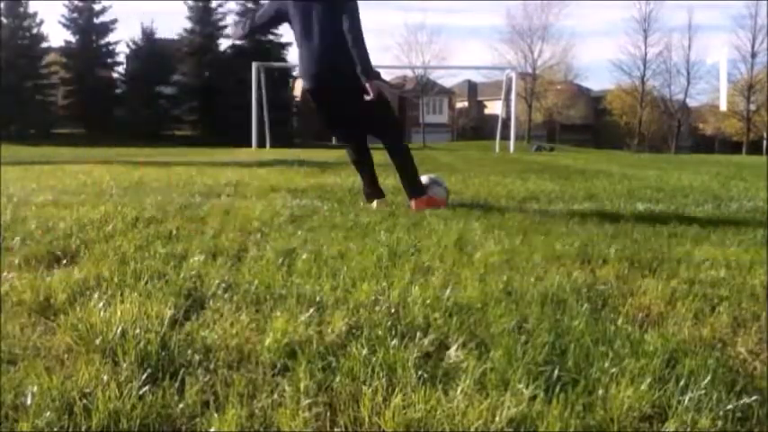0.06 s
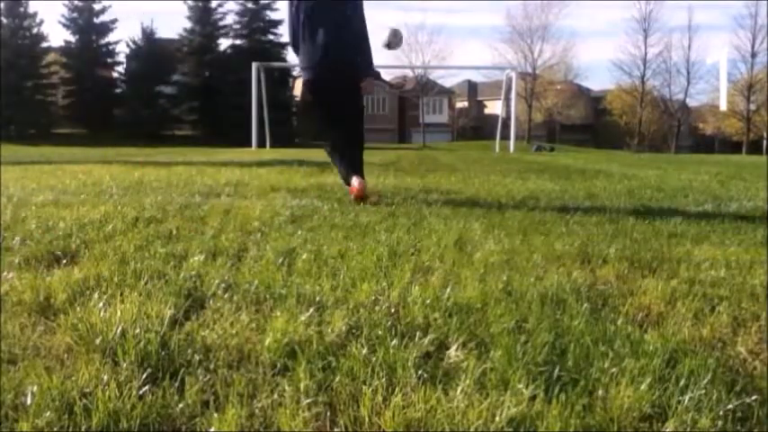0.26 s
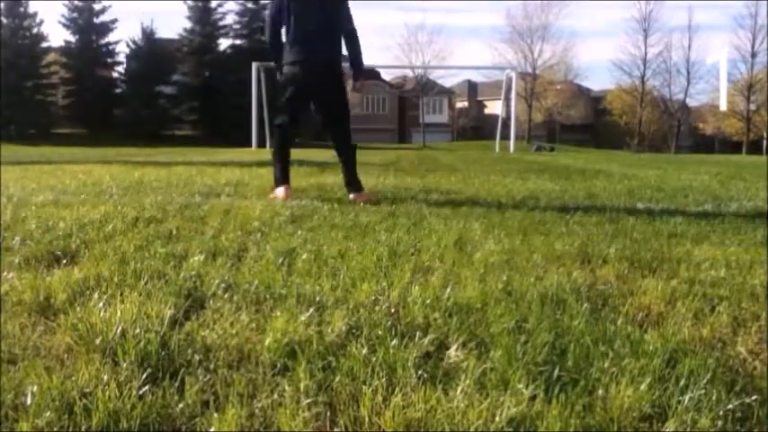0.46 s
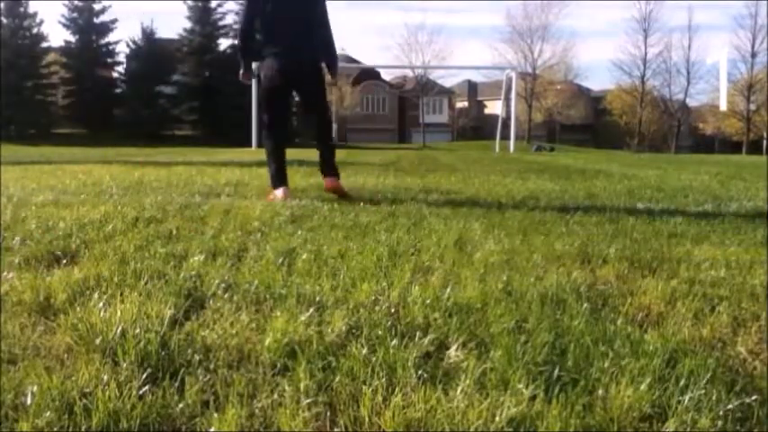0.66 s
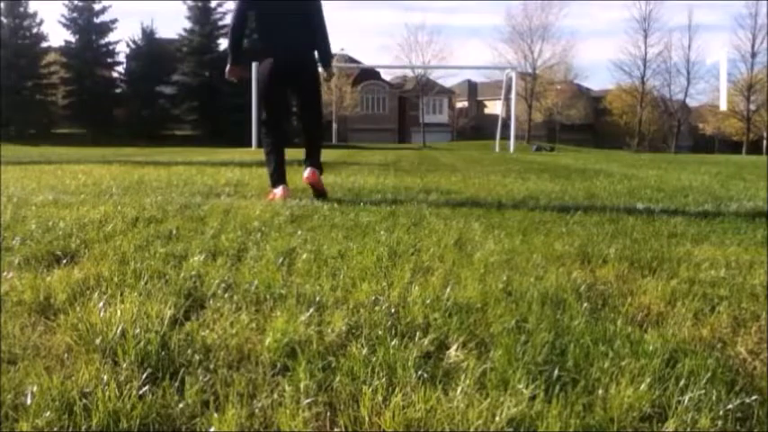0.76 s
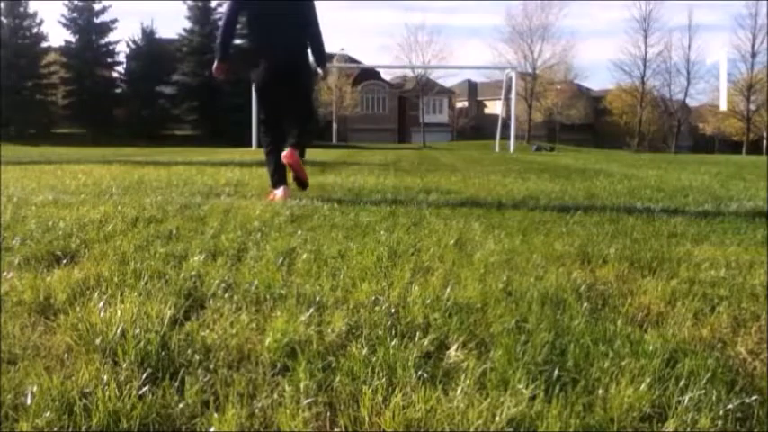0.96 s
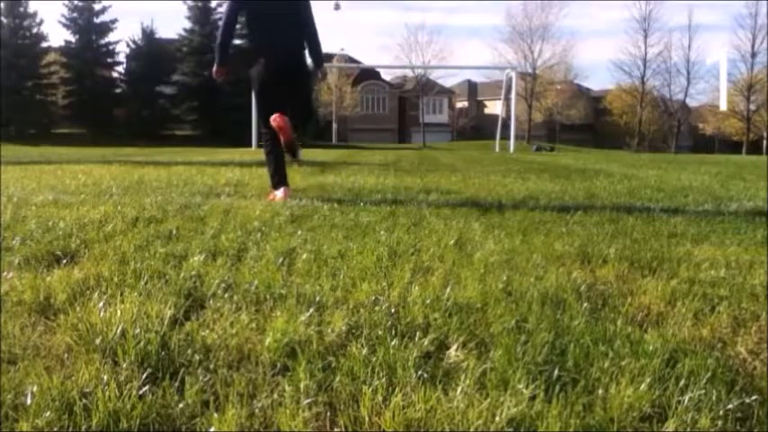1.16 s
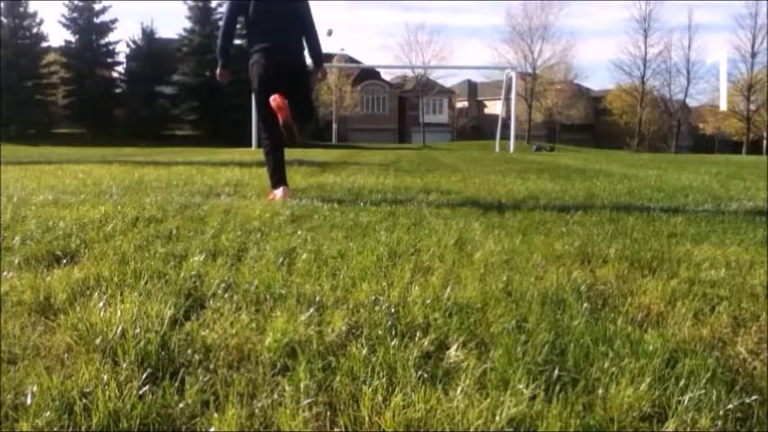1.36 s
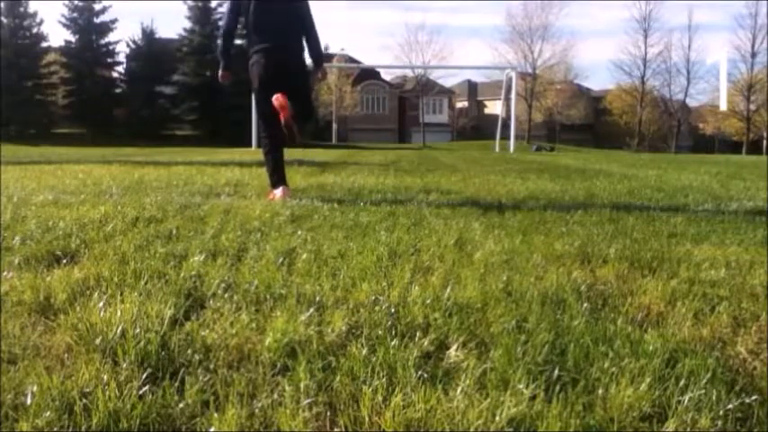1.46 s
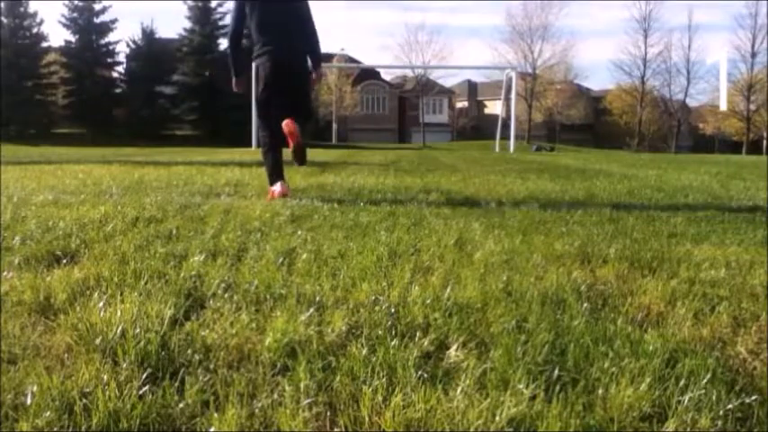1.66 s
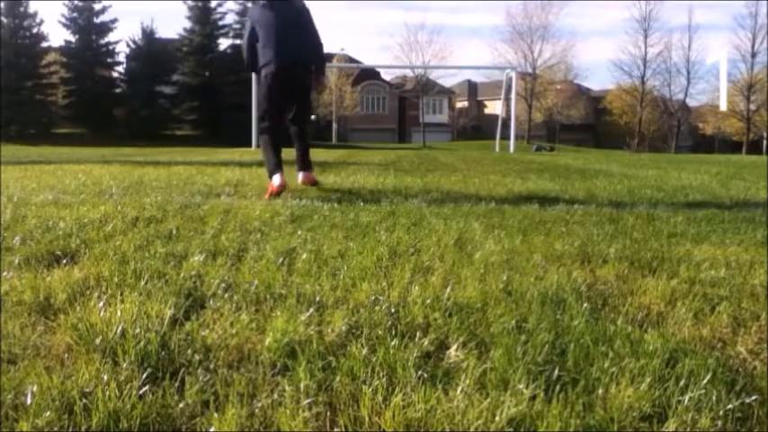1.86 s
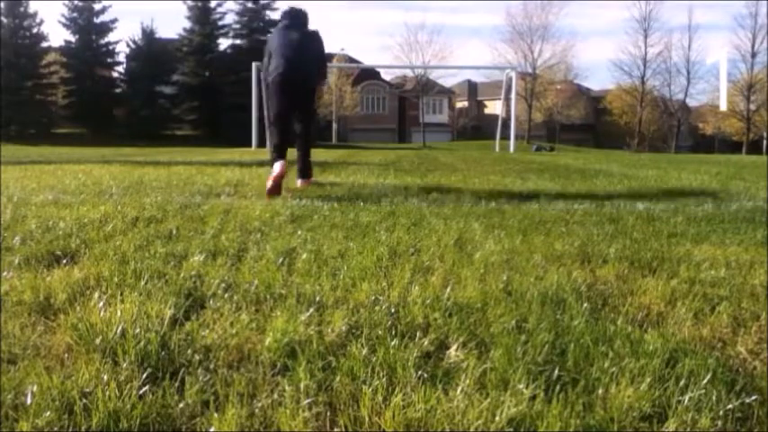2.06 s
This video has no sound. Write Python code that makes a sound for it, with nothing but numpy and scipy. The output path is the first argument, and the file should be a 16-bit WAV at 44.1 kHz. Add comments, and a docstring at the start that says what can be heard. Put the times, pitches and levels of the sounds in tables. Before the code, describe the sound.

One crisp, dull ball kick early on over a quiet open field, faint boot brushes around it, then low fluttering wind thuds on a microphone near the ground, with barely audible distant bird chirps, fading to hush.

```python
"""Light wind and outdoor hush over an open grass field, microphone lying low in the grass; a faint hum dies away.
Boots brush the turf (swells of grainy noise), then a football is kicked a few metres off: a short thump.
The kick sums pressure pulses, decaying ball modes and noise bursts; the boot lands again.
Wind is band noise plus single eddy pulses, strongest from about half a second after the kick.
A small bird calls far off: gliding sines with a noise echo."""
import sys
import numpy as np
from scipy import signal
from scipy.io import wavfile
from scipy.ndimage import uniform_filter1d

SR = 44100
rng = np.random.default_rng(int(sys.argv[2]) if len(sys.argv) > 2 else 0)


def pcm_store(signal):
    """Save signal as 16-bit PCM."""
    levels = np.round(np.clip(np.atleast_2d(signal), -1, 1) * 32767)
    wavfile.write(sys.argv[1], SR, levels.astype(np.int16).T)


N = 92610
TIME_S = np.arange(N) / SR
EDGES_HZ = np.geomspace(20, 17000, 27)
CENTRES_HZ = np.sqrt(EDGES_HZ[1:] * EDGES_HZ[:-1])

# distant outdoor hush, spectrum: (frequency [Hz], relative density [dB per Hz])
AIR_SPECTRUM = [(25, -9.5), (60, -1), (150, -3), (300, -6.5), (600, -11.5), (1200, -19.5), (2500, -23.5),
                (5000, -31), (8500, -30.5), (12000, -35), (16000, -38)]
AIR_DB = -69.5
HUM_HZ, HUM_DB, HUM_FADE_S = 478, -70.5, .3

# wind strength on the microphone: (time [s], RMS level [dB])
WIND_LEVEL = [(0, -63), (.045, -58), (.065, -57), (.125, -50.5), (.15, -63.5), (.175, -52.5), (.205, -58),
              (.27, -64), (.315, -62.5), (.328, -49.5), (.37, -52), (.382, -62), (.52, -60), (.58, -50),
              (.625, -75), (.665, -61.5), (.70, -56.5), (.712, -43), (.755, -43.5), (.80, -56), (.814, -67),
              (.83, -42.5), (.895, -44), (.935, -47), (.952, -62), (.975, -43), (1.018, -42.5),
              (1.028, -69), (1.043, -42), (1.08, -44), (1.095, -65), (1.135, -71), (1.152, -50),
              (1.185, -52.5), (1.21, -58.5), (1.25, -57.5), (1.345, -64.5), (1.40, -51.5), (1.43, -57),
              (1.455, -72), (1.53, -66), (1.56, -58), (1.6, -70), (1.93, -66), (1.98, -62.5), (2.1, -66.5)]
# upper edge of the rumble at WIND_REF_DB: (time [s], frequency [Hz])
WIND_TOP_EDGE = [(.05, 150), (.29, 190), (.335, 343), (.42, 221), (.68, 170), (.74, 237), (.80, 201),
                 (.84, 233), (.96, 185), (1.18, 189), (1.4, 200), (2.1, 171)]
WIND_LOW_HZ, WIND_LOW_EXPONENT = 82, 2.67   # rumble falls away below this
WIND_TOP_EXPONENT, WIND_CEILING_HZ = 3.99, 830
WIND_REF_DB, WIND_DB_PER_OCTAVE = -49, 22.5   # the upper edge rises with strength

# boots through grass: (centre [s], length [s], level [dB], brightness [dB per octave])
BOOT_SWISHES = [(.01, 0.12, -73.5, 3.5), (0.104, .02, -65.5, 0.5), (0.168, 0.073, -76, 3),
                (0.213, 0.008, -54.5, -4.5), (0.229, .014, -49.5, -3), (0.31, 0.026, -74.5, -3.5),
                (0.584, 0.017, -70, .5), (.612, 0.024, -67, -2), (0.646, 0.0073, -72, -.5),
                (1.989, 0.0021, -68.5, 2), (2.039, 0.049, -74.5, -1), (2.046, .003, -67, -8)]
# grass rustle, spectrum before brightness tilt: (frequency [Hz], relative density [dB per Hz])
GRASS_SPECTRUM = [(60, -33), (250, -9), (700, -1.5), (1500, 4.5), (3000, -3), (6000, -9), (10000, -17),
                  (16000, -23)]
GRASS_GRAIN_DB = 1.5   # RMS swing of the grain

# single eddies on the microphone: (centre [s], level [dB], frequency [Hz])
WIND_EDDIES = [(.067, -40.5, 89), (.103, -41.5, 148), (0.208, -43, 160), (.326, -43.5, 350),
               (.335, -42, 297), (.359, -42.5, 229), (.369, -43, 220), (.572, -44.5, 136),
               (0.689, -40.5, 142), (.709, -30.5, 367), (.717, -30, 136), (0.732, -36.5, 272),
               (.753, -36, 265), (.826, -44.5, 460), (.836, -35.5, 268), (.850, -30, 202),
               (.876, -31.5, 295), (.892, -30.5, 223), (.920, -23.5, 312), (.941, -39, 210),
               (.973, -33.5, 198), (0.989, -32, 160), (1.009, -29.5, 370), (1.018, -28.5, 236),
               (1.049, -28.5, 150), (1.0694, -29.5, 245), (1.081, -36, 362), (1.150, -41.5, 199),
               (1.178, -32.5, 200), (1.225, -45.5, 200), (1.389, -46.5, 230), (1.407, -39, 175),
               (1.429, -44.5, 156), (1.847, -38, 176)]
EDDY_CYCLES = 0.28
CORE_DB, CORE_RATIO, CORE_CYCLES = -20.5, 2.23, 0.13   # steep core, against the body
CORE_GROWTH_DB_PER_DB, CORE_REF_DB = .6, -23.5   # stronger eddies have steeper cores

KICK_S = .2305
KICK_LOW_CUT_HZ = 48.3   # gentle low cut that keeps the kick's thump tight
# ball modes: (frequency [Hz], level before attack and decay [dB], t60 [s])
BALL_MODES = [(282, -36, 0.024), (540, -30, .028), (615, -41, .035), (710, -46, 0.032), (830, -39.5, 0.03),
              (1119, -43, 0.044), (1240, -42.5, .04), (1340, -49, .04), (1453, -47.5, 0.036),
              (1847, -46, .055), (2080, -52, 0.041), (2316, -69, 0.32), (2987, -71.5, 0.32),
              (3017, -69, 0.48), (3450, -72, 0.22), (4030, -73, .25), (6170, -42.5, 0.032)]
BALL_ATTACK_S = 0.00074
THUMP_DB, THUMP_HZ, THUMP_S = -25, 111, .015   # ball flattens and springs back
PUSH_DB, PUSH_RISE_S = -22.5, 0.00028   # first pressure pulse of the dented ball
CRACK_DB, CRACK_HZ, CRACK_RISE_S = -25, 5130, 0.00014   # leather on leather
# ticks as toe and instep land: (delay after kick [s], peak level [dB])
KICK_TICKS = [(.0003, -27.5), (.0014, -34)]
TICK_SIGMA_S = .00002
# dull second knock as the ball leaves
KNOCK_DELAY_S, KNOCK_DB, KNOCK_HZ, KNOCK_RISE_S = .0133, -33.5, 510, 0.00086
# leather slap, spectrum: (frequency [Hz], relative density [dB per Hz])
SLAP_SPECTRUM = [(60, -20), (250, -5), (550, 5), (1200, -6), (2200, -10.5), (3300, -19), (5300, -3.5),
                 (7000, -10.5), (9000, -36), (16000, -46)]
SLAP_DB, SLAP_T60_S = -33.5, 0.0085
# slap scattered off the ground, spectrum: (frequency [Hz], relative density [dB per Hz])
SCATTER_SPECTRUM = [(80, -8), (300, 0), (600, 4.5), (1200, 2), (2200, -10.5), (3200, -33), (4300, -8),
                    (6300, -9), (7300, -16), (8800, -55), (16000, -63)]
SCATTER_DB, SCATTER_T60_S = -40, 0.084
SCATTER_HOLD_S, SCATTER_RELEASE_S = 0.033, 0.0033   # faster decay after the hold

# far bird: (start [s], length [s], start pitch [Hz], end pitch [Hz], peak level [dB])
BIRD_CHIRPS = [(0.548, 0.032, 3450, 3310, -75.5), (1.11, 0.031, 3350, 3455, -78.5),
               (1.14, 0.086, 3370, 3376, -86), (1.332, 0.011, 3500, 2800, -76),
               (1.353, 0.029, 2750, 2910, -75), (1.374, .016, 2900, 3320, -73.5),
               (1.382, 0.022, 2900, 2580, -75)]
BIRD_ECHO_DB, BIRD_ECHO_T60_S = -10, 0.56

CUTOFF_HZ = 15800


def from_db(db):
    """Decibels to gain."""
    return 10 ** (np.asarray(db) / 20)


def rms_one(x):
    """Scale to unit RMS."""
    return x / np.sqrt(np.mean(x ** 2) + 1e-20)


def noise_bands():
    """White noise split into narrow bands; neighbours come from separate noises."""
    white = rng.standard_normal((2, N))
    bands = []
    for k in range(len(CENTRES_HZ)):
        band_pass = signal.butter(2, EDGES_HZ[k:k + 2], "band", fs=SR, output="sos")
        bands.append(signal.sosfilt(band_pass, white[k % 2]))
    return np.array(bands)


def gains(spectrum, hz):
    """Read a spectrum at the given frequencies, interpolated over log frequency."""
    points_hz, db = np.transpose(spectrum)
    return from_db(np.interp(np.log(hz), np.log(points_hz), db))


def shaped_noise(spectrum):
    """Unit-RMS noise with the given spectrum."""
    return rms_one(gains(spectrum, CENTRES_HZ) @ noise_bands())


def dying(age_s, t60_s):
    """Silent before age zero, then an exponential decay."""
    return (age_s >= 0) * from_db(-60 * np.maximum(age_s, 0) / t60_s)


def swell(age_s, rise_s):
    """Rises to one in rise_s, then falls back."""
    along = np.maximum(age_s, 0) / rise_s
    return along * np.exp(1 - along)


def sine(hz, age_s):
    """Sine of fixed pitch, phase zero at age zero."""
    return np.sin(2 * np.pi * hz * age_s)


def air():
    """Steady distant hush: shaped noise."""
    return from_db(AIR_DB) * shaped_noise(AIR_SPECTRUM)


def hum():
    """Faint far tone under a Gaussian fade."""
    return from_db(HUM_DB) * np.exp(-(TIME_S / HUM_FADE_S) ** 2) * sine(HUM_HZ, TIME_S)


def wind():
    """Turbulent rumble that grows brighter as it grows stronger."""
    db = np.interp(TIME_S, *np.transpose(WIND_LEVEL))
    octaves_up = (db - WIND_REF_DB) / WIND_DB_PER_OCTAVE
    top_hz = np.interp(TIME_S, *np.transpose(WIND_TOP_EDGE)) * 2 ** octaves_up
    rumble = np.zeros(N)
    for hz, band in zip(CENTRES_HZ, noise_bands()):
        low_loss = 1 + (WIND_LOW_HZ / hz) ** WIND_LOW_EXPONENT
        top_loss = 1 + (hz / top_hz) ** WIND_TOP_EXPONENT
        rumble += band / low_loss / top_loss
    rumble = signal.sosfilt(signal.butter(4, WIND_CEILING_HZ, fs=SR, output="sos"), rumble)
    local_rms = np.sqrt(uniform_filter1d(rumble ** 2, size=1100) + 1e-20)   # 25 ms window
    return from_db(db) * rumble / local_rms


def boots():
    """Each brush through the grass is a Gaussian swell of grainy rustle."""
    bands = noise_bands()
    grain_db = GRASS_GRAIN_DB * rms_one(uniform_filter1d(rng.standard_normal(N), size=50))
    grain = rms_one(from_db(grain_db))
    out = np.zeros(N)
    for centre_s, length_s, db, tilt_db in BOOT_SWISHES:
        tilt = from_db(tilt_db * np.log2(CENTRES_HZ))
        rustle = rms_one((gains(GRASS_SPECTRUM, CENTRES_HZ) * tilt) @ bands)
        out += from_db(db) * np.exp(-2 * ((TIME_S - centre_s) / length_s) ** 2) * rustle
    return out * grain


def eddies():
    """Each eddy is one quick suck and push of air, steepest at its core."""
    out = np.zeros(N)
    for centre_s, db, hz in WIND_EDDIES:
        cycles = np.clip((TIME_S - centre_s) * hz, -10, 10)
        body = np.sin(2 * np.pi * cycles) / np.cosh(cycles / EDDY_CYCLES)
        core = np.sin(2 * np.pi * CORE_RATIO * cycles) / np.cosh(cycles / CORE_CYCLES)
        core_db = CORE_DB + CORE_GROWTH_DB_PER_DB * (db - CORE_REF_DB)
        out += from_db(db) * (body + from_db(core_db) * core)
    return out


def kick():
    """Pressure pulse, crack and slap of leather, ball thump and modes, second knock, turf scatter."""
    age_s = TIME_S - KICK_S
    push = from_db(PUSH_DB) * swell(age_s, PUSH_RISE_S)
    crack = from_db(CRACK_DB) * swell(age_s, CRACK_RISE_S) * sine(CRACK_HZ, age_s)
    ticks = sum(from_db(db) * np.exp(-.5 * ((age_s - delay_s) / TICK_SIGMA_S) ** 2)
                for delay_s, db in KICK_TICKS)
    thump = from_db(THUMP_DB) * (age_s >= 0) * np.exp(-(age_s / THUMP_S) ** 2) * sine(THUMP_HZ, age_s)
    modes = sum(from_db(db) * dying(age_s, t60_s) * sine(hz, age_s) for hz, db, t60_s in BALL_MODES)
    modes = modes * (1 - np.exp(-np.maximum(age_s, 0) / BALL_ATTACK_S))
    knock_age_s = age_s - KNOCK_DELAY_S
    knock = from_db(KNOCK_DB) * swell(knock_age_s, KNOCK_RISE_S) * np.cos(2 * np.pi * KNOCK_HZ * knock_age_s)
    slap = from_db(SLAP_DB) * dying(age_s, SLAP_T60_S) * shaped_noise(SLAP_SPECTRUM)
    release = np.exp(-np.maximum(age_s - SCATTER_HOLD_S, 0) / SCATTER_RELEASE_S)
    scatter_fade = dying(age_s, SCATTER_T60_S) * release
    scatter = from_db(SCATTER_DB) * scatter_fade * shaped_noise(SCATTER_SPECTRUM)
    blow = push + crack + ticks - thump + modes + knock + slap + scatter   # thump starts downwards
    return signal.sosfilt(signal.butter(1, KICK_LOW_CUT_HZ, "high", fs=SR, output="sos"), blow + 1e-18)


def bird():
    """Short gliding whistles with a faint echo from the trees (decaying noise)."""
    song = np.zeros(N)
    for start_s, length_s, start_hz, end_hz, db in BIRD_CHIRPS:
        along = np.clip((TIME_S - start_s) / length_s, 0, 1)
        pitch_hz = start_hz + (end_hz - start_hz) * along
        whistle = np.sin(2 * np.pi * np.cumsum(pitch_hz) / SR)
        song += from_db(db) * np.sin(np.pi * along) * whistle
    trees = rng.standard_normal(N) * dying(TIME_S, BIRD_ECHO_T60_S)
    echo = signal.fftconvolve(song, trees / np.linalg.norm(trees))[:N]
    return song + from_db(BIRD_ECHO_DB) * echo


def scene():
    """Hush, hum, wind, boots, kick and bird, summed to one channel."""
    return (air() + hum() + wind() + boots() + eddies() + kick() + bird())[None]


def record(dry):
    """Steep elliptic low-pass at CUTOFF_HZ."""
    return signal.sosfilt(signal.ellip(10, .1, 70, CUTOFF_HZ, fs=SR, output="sos"), dry)


dry = scene()
out = record(dry)
pcm_store(out)
```